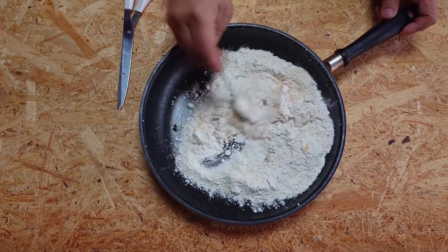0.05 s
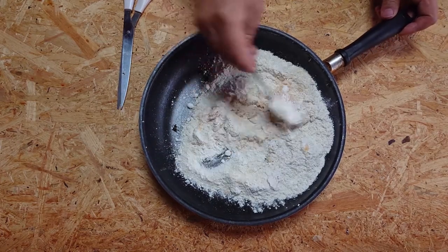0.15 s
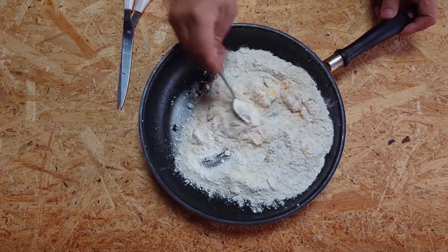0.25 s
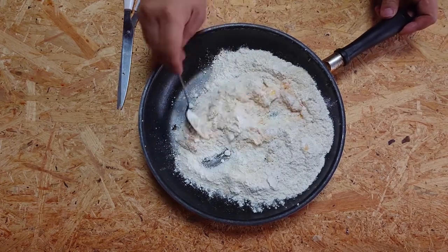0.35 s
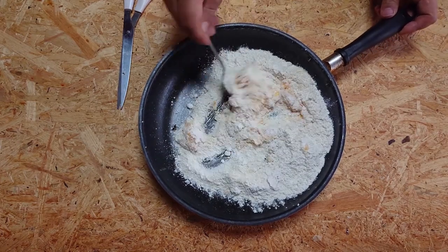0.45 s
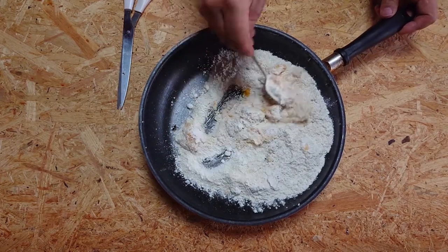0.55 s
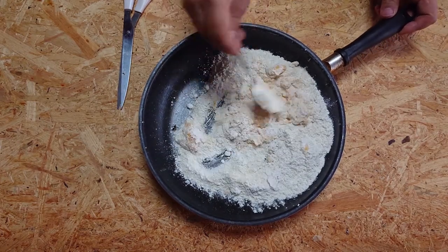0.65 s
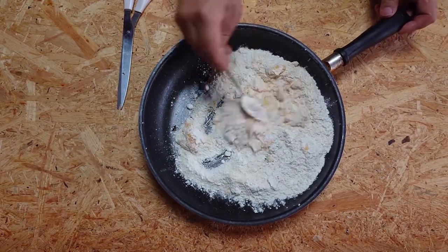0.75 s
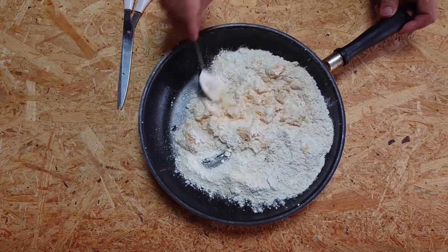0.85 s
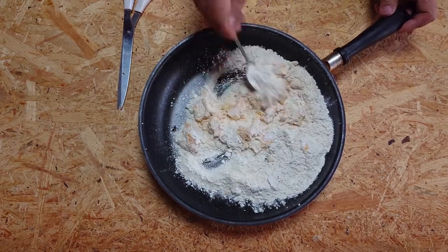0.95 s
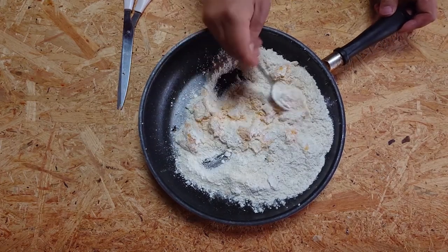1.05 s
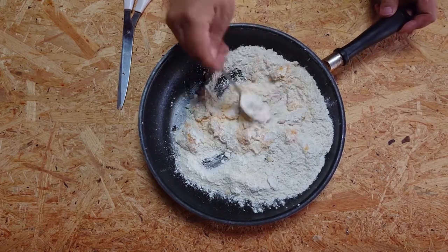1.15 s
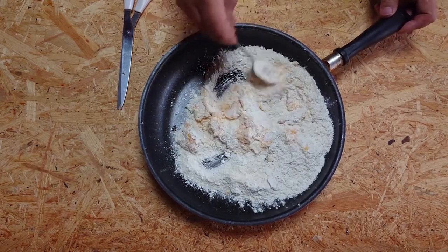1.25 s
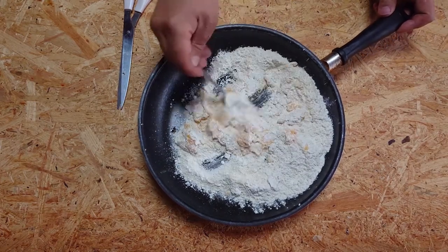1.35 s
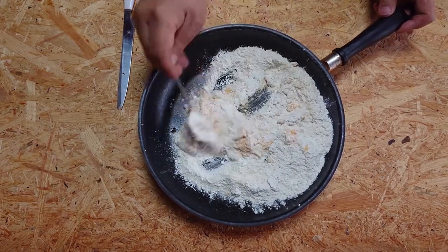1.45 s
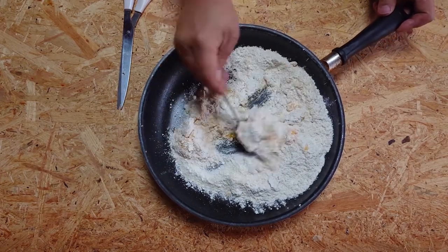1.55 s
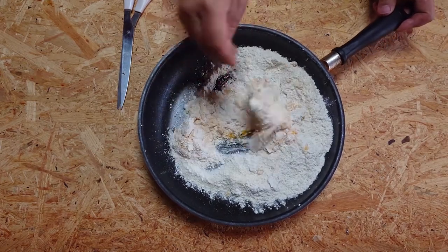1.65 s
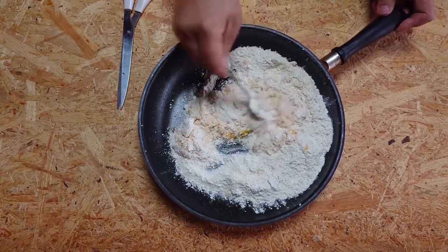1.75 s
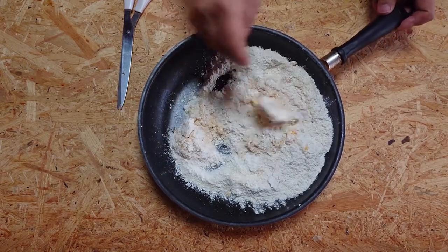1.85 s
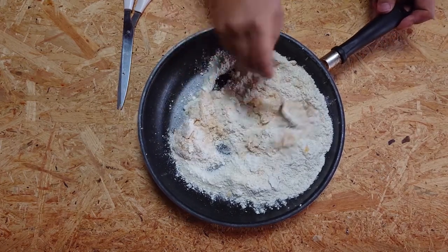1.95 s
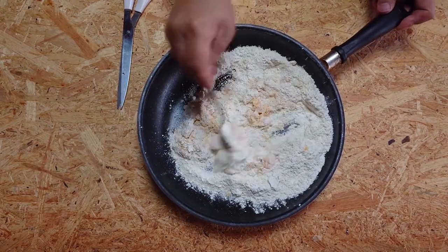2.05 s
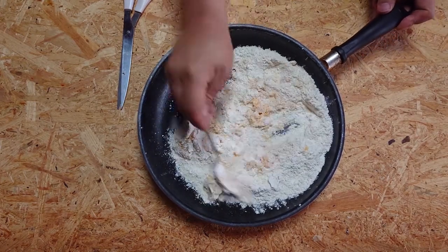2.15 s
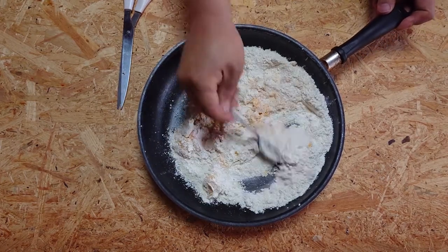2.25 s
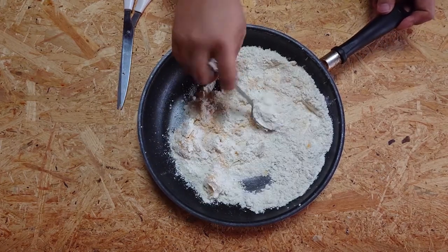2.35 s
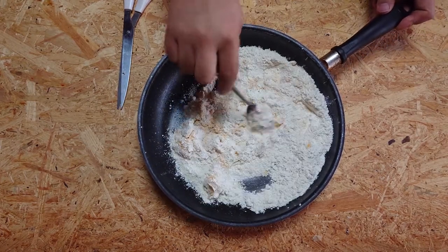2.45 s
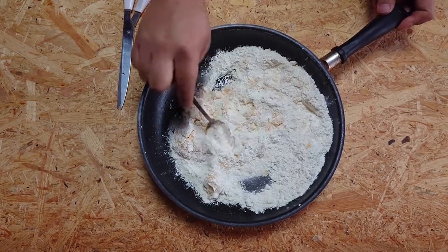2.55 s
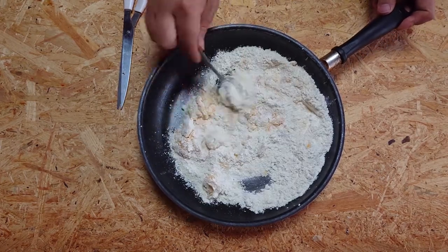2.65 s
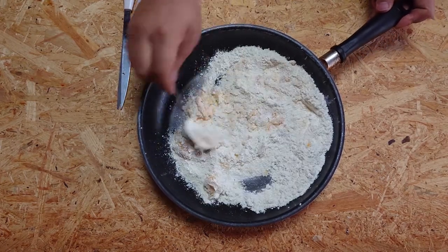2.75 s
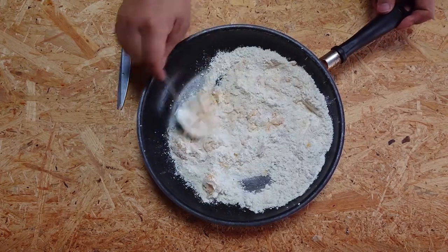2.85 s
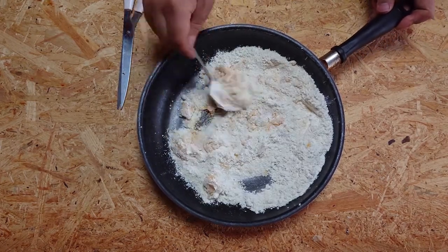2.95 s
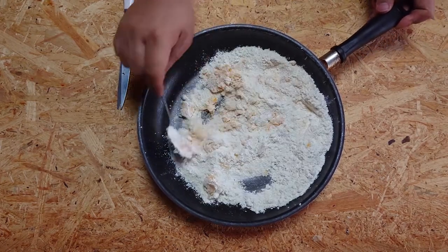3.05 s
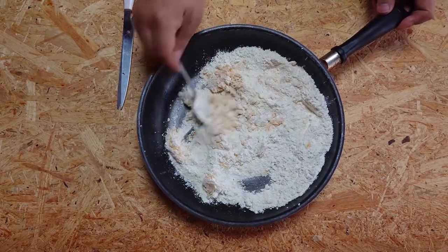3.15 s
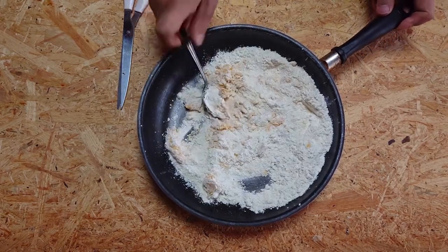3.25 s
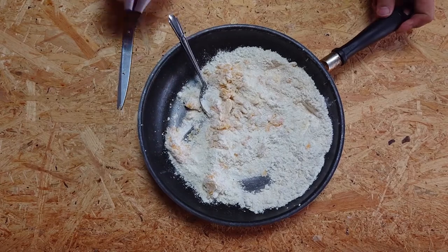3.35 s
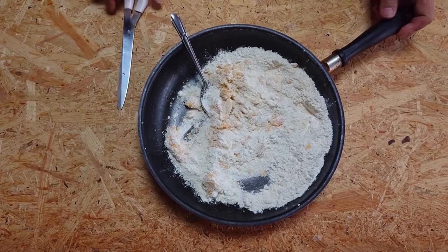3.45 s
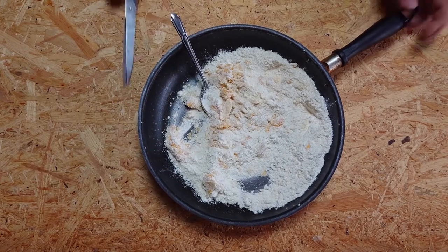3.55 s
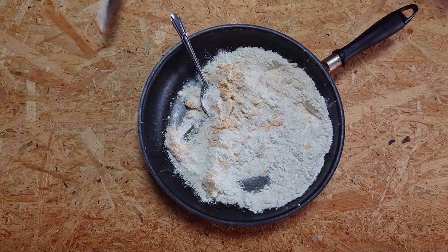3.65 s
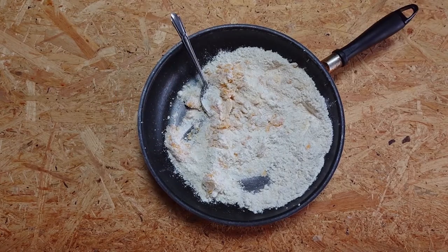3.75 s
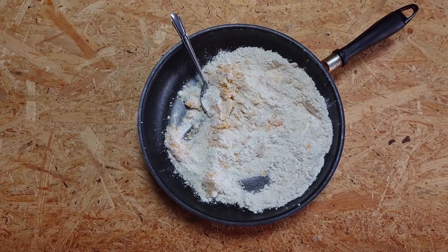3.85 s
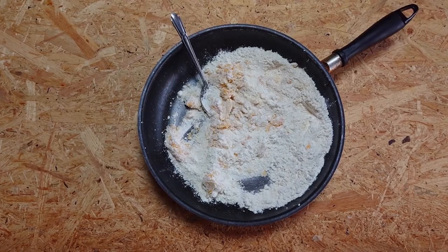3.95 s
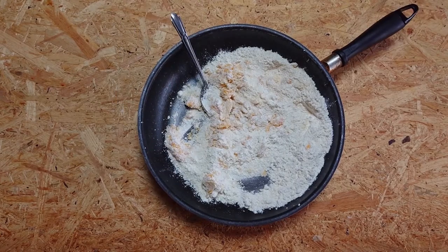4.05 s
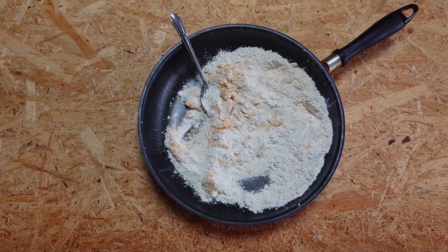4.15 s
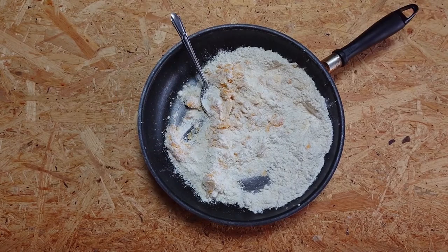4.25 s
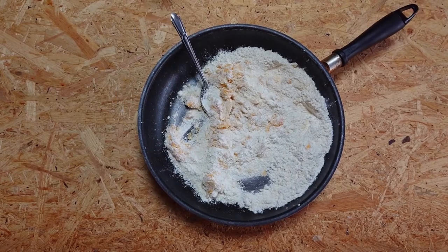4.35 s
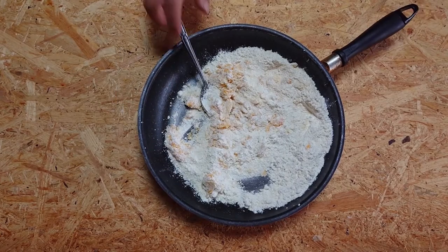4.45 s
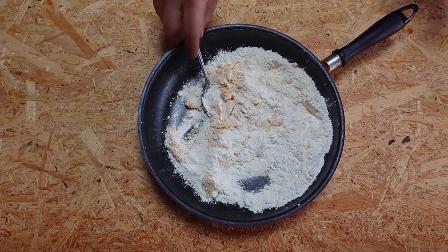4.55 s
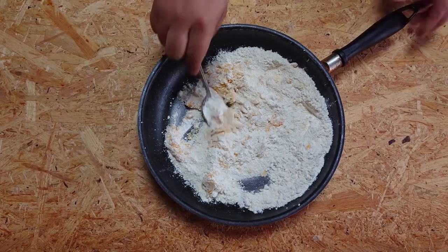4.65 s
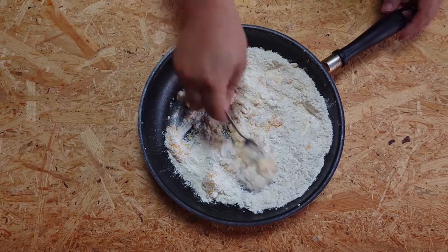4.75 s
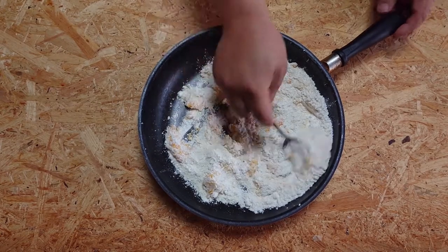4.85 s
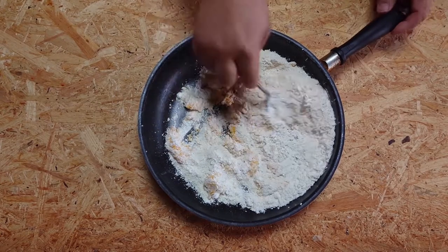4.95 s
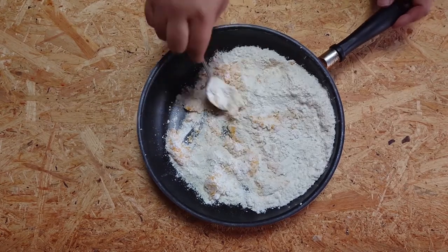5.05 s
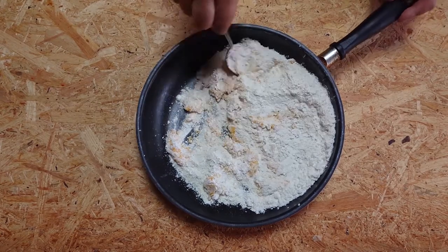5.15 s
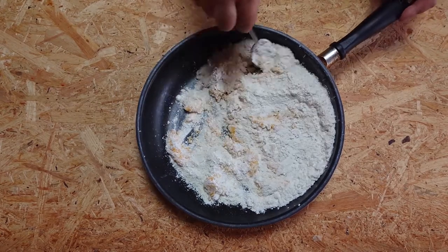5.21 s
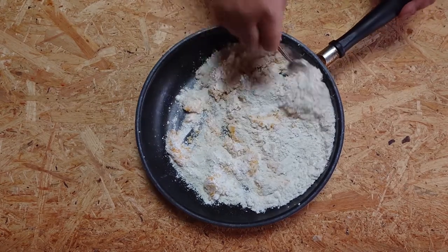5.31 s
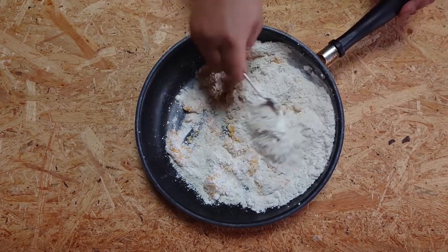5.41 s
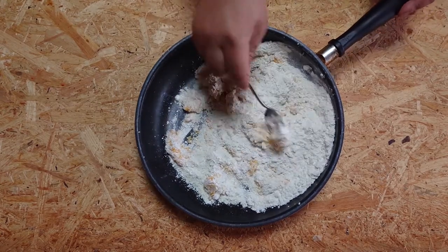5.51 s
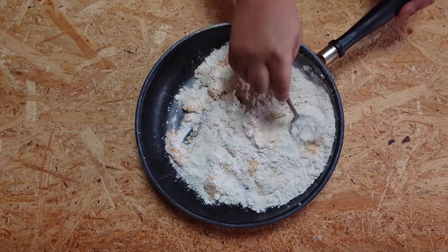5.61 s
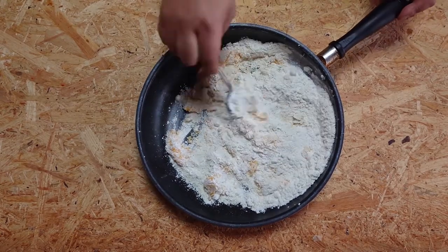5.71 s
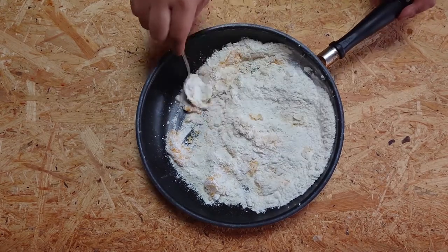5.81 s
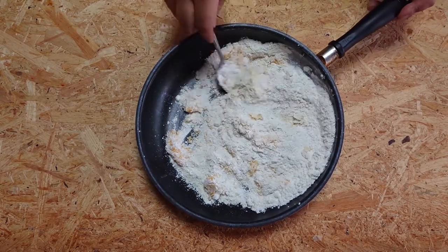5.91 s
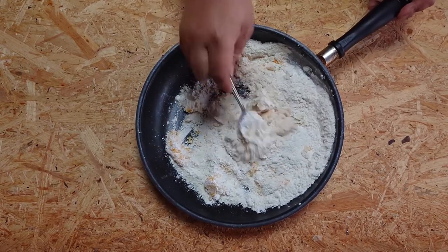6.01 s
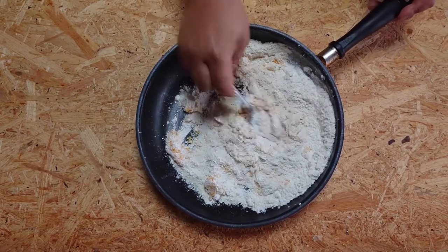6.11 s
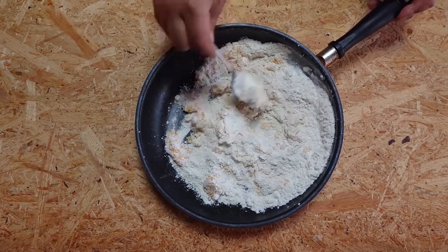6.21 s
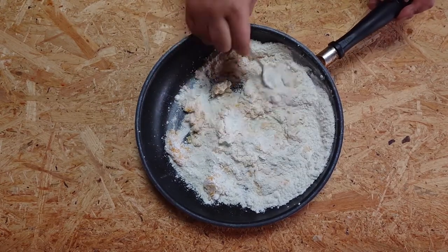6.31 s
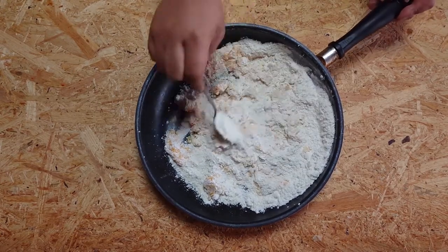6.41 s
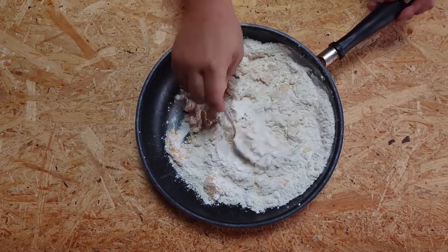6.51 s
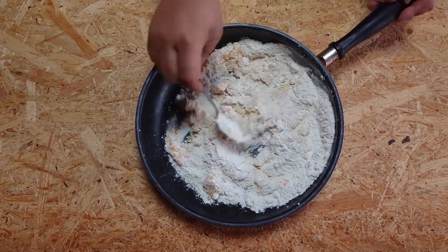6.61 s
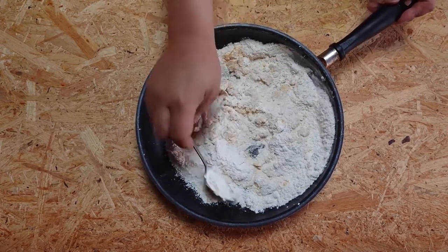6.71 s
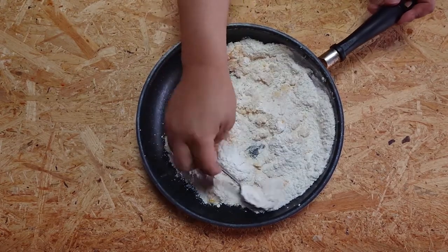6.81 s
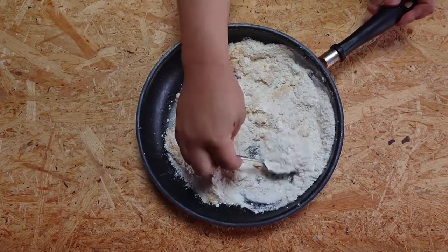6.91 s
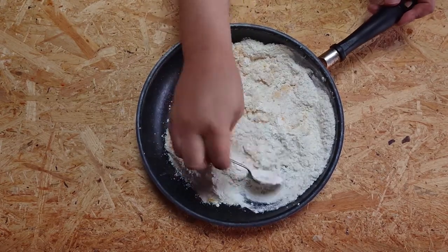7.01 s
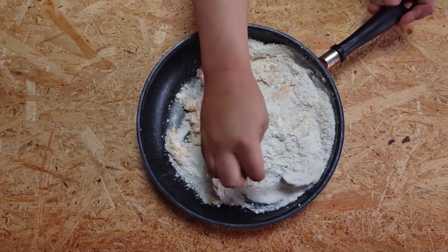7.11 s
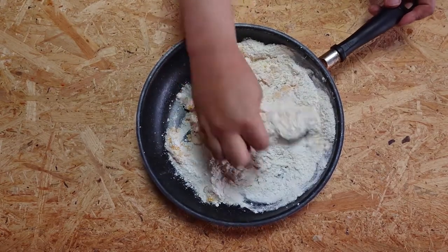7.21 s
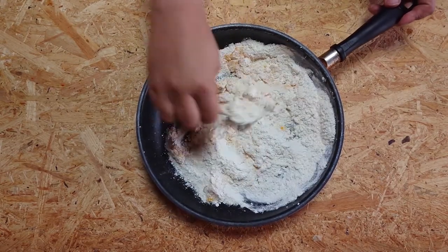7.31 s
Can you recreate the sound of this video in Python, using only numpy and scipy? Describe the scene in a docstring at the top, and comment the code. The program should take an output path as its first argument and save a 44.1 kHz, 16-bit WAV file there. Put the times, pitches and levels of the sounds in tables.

```python
"""A metal spoon stirs dry flour in a frying pan on a wooden board, heard by two close microphones in a small room.
From the start the spoon scrapes through to the pan as gliding resonances driven by stick-slip grains, over
a lumpy filtered-noise rumble of flour, room air and a faint tone. The pan rocks and knocks in dying modes; powder
hisses along the steel in soft grains. Midway the spoon clinks on the rim, a hard blow with many modes and a buzz;
the pan slides in rubs of filtered friction, and the stirring resumes."""
import sys
import numpy as np
from scipy import signal
from scipy.fft import rfft, irfft
from scipy.io import wavfile

SR = 44100
rng = np.random.default_rng(int(sys.argv[2]) if len(sys.argv) > 2 else 0)


def dump_mix(stems):
    """Bounce the given channels to the path in sys.argv[1] as a 16-bit WAV at rate SR."""
    frames = np.atleast_2d(stems).T  # one column per channel
    limited = np.clip(frames, -1, 1)  # hard clip at full scale
    pcm = np.round(limited * 32767).astype(np.int16)
    wavfile.write(sys.argv[1], SR, pcm)


N = 325017


def amp(db):
    """Decibels to gain."""
    return 10 ** (np.asarray(db) / 20)


def unit(x):
    """Scales to rms 1."""
    return x / np.sqrt(np.mean(x ** 2) + 1e-20)


def read(points, hz):
    """Joins (Hz, value) points on a log-frequency axis."""
    f, value = np.transpose(points)
    return np.interp(np.log(hz + 1), np.log(f + 1), value)


def bump(hz, centre, width):
    """The bell shape of a resonance, height 1."""
    return 1 / (1 + (2 * (hz - centre) / width) ** 2)


def add(mix, s, sound):
    """Mixes a sound in at time s."""
    part = mix[max(round(s * SR), 0):][:len(sound)]
    part += sound[:len(part)]


def colour(x, shape, size=2048):
    """Causal minimum-phase filter whose gain in dB is shape(Hz), held above -90 dB."""
    hz = abs(np.fft.fftfreq(size, 1 / SR))
    log_gain = np.log(amp(np.maximum(shape(hz), -90)))
    taps = np.fft.ifft(np.exp(np.conj(signal.hilbert(log_gain)))).real
    return signal.fftconvolve(x, taps[:size // 2])


def pair(x):
    """Two unrelated signals become a diffuse field at two close microphones, unlike in the treble."""
    # left-right likeness: pitch_hz, likeness (-1 to 1)
    likeness = [(60, 0.43), (130, 0.64), (290, 0.6), (640, 0.61), (1410, 0.51), (3100, -0.0056),
                (6820, -0.0065), (15000, -0.11)]
    a, b = rfft(x)
    same = np.clip(read(likeness, np.fft.rfftfreq(x.shape[1], 1 / SR)), -1, 1)
    return irfft([a, same * a + np.sqrt(1 - same ** 2) * b], x.shape[1])


def ring(modes):
    """The dying modes of a struck object, each a sine that falls 60 dB in its t60."""
    t = np.arange(SR // 3) / SR
    return sum(amp(db - 60 * t / t60) * np.sin(2 * np.pi * hz * t) for hz, db, t60 in modes)


def friction(length, crest, slips_per_s, spread_db, hiss, swell):
    """Tiny slips of uneven size over a fine hiss, under a pressure that rises and falls."""
    longest = SR // 2
    u = np.linspace(0, 1, np.clip(int(length * SR), 64, longest))
    draw = rng.random(longest)
    size, fine = rng.standard_normal((2, longest))
    slips = (draw < slips_per_s / SR) * np.sign(fine) * amp(spread_db * np.clip(size, -2, 2))
    pressure = np.interp(u, [0, np.clip(crest, .03, .97), 1], [0, 1, 0]) ** swell
    return pressure * (unit(slips[:len(u)]) + hiss * fine[:len(u)])


def levelled(sound, length, db):
    """Gives a burst this mean level over its length."""
    return amp(db) * sound * np.sqrt(length * SR / np.sum(sound ** 2))


def grate(length, crest, bare_s, treble_db, body_db, treble_hz=6500, body_hz=1400, muffled_hz=4000):
    """Steel sticks and slips on the pan floor; flour muffles it until the edge has cut through."""
    # steel on the pan floor: pitch_hz, density_db (per Hz)
    scrape_tone = [(180, -61.5), (300, -16), (645, -20.5), (1300, -13), (1810, -4.5), (2880, -3),
                   (3640, -5), (4230, -6), (4990, -5), (7080, -8), (9710, -5), (10900, -13), (12700, -6.5),
                   (16000, -13)]
    judder_hz, judder_db, judder_spread = 210, 6.5, .35  # median rate, fall between releases, log unevenness

    def shape(hz):
        treble = treble_db * hz ** 4 / (hz ** 4 + treble_hz ** 4)
        body = body_db / (1 + (hz / body_hz) ** 8)
        return read(scrape_tone, hz) + treble + body

    slips = friction(length, crest, slips_per_s=1600, spread_db=-2.5, hiss=1.0, swell=0.38)
    t = np.arange(len(slips)) / SR
    gaps = np.exp(judder_spread * rng.standard_normal(64)) / judder_hz
    releases = np.cumsum(np.r_[0, gaps])
    since_release = np.interp(t, releases, np.arange(len(releases))) % 1  # share of the current gap
    slips = slips * amp(-judder_db * since_release)
    muffled = signal.lfilter(*signal.butter(2, muffled_hz, fs=SR), slips)
    bare = np.minimum(t / bare_s, 1) ** 2
    return colour(bare * slips + (1 - bare) * muffled, shape)


def resonate(x, hz, width):
    """A resonance of gain 1 that follows the pitch curve hz."""
    turn = np.exp(2j * np.pi * np.cumsum(hz) / SR)
    r = np.exp(-np.pi * width / SR)
    return 2 * (turn * signal.lfilter([1 - r], [1, -r], x / turn)).real


def scrapes(place, count):
    """The grating wakes two resonances that glide as the place of contact moves."""
    # one row per contact of the spoon with the pan floor; a long stroke catches two or three times:
    # start_s, length_s, level_db (before the room), crest (moment of most pressure, 0-1),
    # bare_s (time to cut through the flour), treble_db, body_db, low_hz, low_db, high_hz, high_db,
    # width (ring width over pitch), glide_octaves
    contacts = [(0.0, 0.01, -39.5, 0, 0.0028, 4, 0, 3020, 10, 5830, 11.5, 0.29, -0.15),
                (.4765, 0.026, -29, 0.57, 0.0076, 5.5, -5, 3030, 27.5, 5160, 20, 0.2, -0.11),
                (.501, 0.021, -34.5, 0.2, .002, 8, 2.5, 2800, -2, 5640, 6, 0.28, 0),
                (.977, 0.017, -36, 0.28, 0.012, 9.5, -24, 2270, 12, 3000, 17, 0.28, 0.29),
                (.995, 0.04, -30, 0.43, .003, 12, -4, 2680, 21.5, 3500, 25, 0.21, 0.027),
                (1.41, .012, -63, 0.2, .003, -2, -2, 2700, 13, 4000, 3, .2, 0),
                (1.613, 0.034, -28.5, 0.64, 0.0066, 5.5, -4, 2780, 7.5, 5500, 11, 0.36, -0.1),
                (1.665, .02, -42.5, 0.2, 0.0034, -7, -2, 2400, -1, 5000, 0, 0.27, 0),
                (1.735, 0.057, -61, 0, .004, 1, 23, 1800, 18, 2580, 10, .25, 0),
                (2.036, 0.0095, -51, 0.1, 0.0022, 2, 18, 2720, 10, 4240, -8, 0.66, -0.0049),
                (2.277, 0.017, -41, 0.7, 0.0074, 5.5, 3, 2600, 5, 3740, 5.5, 0.082, -0.082),
                (2.476, 0.01, -68, .5, .004, -6, 2, 2700, 2, 3500, 22, 0.15, 0),
                (3.24, .015, -65.5, .5, .004, 0, -2, 2700, 9, 3600, 6, 0.18, 0),
                (4.812, 0.041, -44.5, 0.65, 0.0029, -3, 8, 2850, 10.5, 5650, 9.5, 0.3, -0.22),
                (4.849, 0.032, -46.5, 0.8, .003, -6, -9, 2850, 10, 3760, 3, 0.18, -0.048),
                (4.88, 0.051, -53.5, 0.4, .003, 2.5, 7, 2700, 10.5, 3700, 3, 0.13, 0.039),
                (5.405, 0.025, -43, 0.4, 0.0022, 1.5, 9.5, 2410, 14.5, 4000, 18, 0.19, 0.078),
                (5.445, 0.02, -42, 0.9, 0.0022, -1, 6.5, 2300, 13.5, 3940, 16, 0.15, 0.17),
                (5.951, 0.059, -63, 0, 0.0049, 4, 8, 2180, 16, 3370, 7, 0.22, 0.14),
                (5.992, 0.041, -47, 0.66, 0.0067, 2.5, -14, 2350, 15.5, 3460, 11, 0.2, 0.26),
                (6.637, 0.016, -30, 0.78, 0.0056, 2.5, -4.5, 3870, 12.5, 5530, 13.5, 0.1, -0.024),
                (6.888, 0.036, -48, 0.4, .005, 8, 1, 2440, 7, 4360, 17.5, 0.12, -0.48),
                (6.926, 0.037, -46.5, 0.8, .002, 5, 4, 2580, 11.5, 4130, 16, 0.19, -0.22),
                (7.197, 0.034, -45, 0.12, 0.0011, 8.5, 3, 2650, 12, 3910, 16, 0.077, -0.034),
                (7.244, 0.054, -43.5, 0.08, .002, 3, 0, 2440, 7, 3850, 16, 0.093, 0.17)]
    out = np.zeros(N)
    for (s, length, db, crest, bare_s, treble_db, body_db,
         low_hz, low_db, high_hz, high_db, width, glide) in contacts[place::count]:
        rub = grate(length, crest, bare_s, treble_db, body_db)
        u = np.minimum(np.arange(len(rub)) / SR / length, 1)
        bend = 2 ** (glide * (u - .5))
        rings = sum((amp(ring_db) - 1) * resonate(rub, hz * bend, hz * width)
                    for hz, ring_db in [(low_hz, low_db), (high_hz, high_db)])
        add(out, s, levelled(rub + rings, length, db))
    return out


def flour(lumps_db=3, fade_s=0.23):
    """A soft, lumpy rumble of filtered noise as the spoon ploughs through the powder."""
    # spells of stirring at full effort, fades lying outside: start_s, end_s, level_db (before the room)
    spells = [(0, 4.2, -64), (4.8, 7.4, -68)]
    # rumble of the powder: pitch_hz, density_db (per Hz)
    flour_tone = [(20, -51.5), (50, -27), (80, -1.5), (170, 3), (300, -4.5), (600, -22), (1200, -20.5),
                  (3500, -38.5), (9000, -39), (16000, -43)]
    lumps = unit(signal.oaconvolve(rng.standard_normal(N), signal.windows.hann(SR // 14), "same"))
    rub = colour(rng.standard_normal(N) * amp(lumps_db * lumps), lambda hz: read(flour_tone, hz))[:N]
    t = np.arange(N) / SR
    effort = sum(amp(db) * np.clip(1 + np.minimum(t - start, end - t) / fade_s, 0, 1)
                 for start, end, db in spells)
    return unit(rub) * effort


def air(level_db=-64.5):
    """Steady room noise, diffuse at the two microphones."""
    # noise of the room: pitch_hz, density_db (per Hz)
    air_tone = [(15, -56), (25, -30), (43, -29.5), (68, -16), (145, -0.5), (212, -7), (285, -9),
                (427, -11.5), (545, -9), (624, -14.5), (1100, -21), (1790, -22.5), (2550, -25),
                (4140, -26.3), (13000, -33.5), (16000, -38)]
    # shallow dips in that noise: pitch_hz, width_hz, height_db
    air_dips = [(524, 47, -2.5), (169, 190, -4)]
    hz = np.fft.rfftfreq(N, 1 / SR)
    shape = read(air_tone, hz) + sum(db * bump(hz, f, width) for f, width, db in air_dips)
    noise = pair(rng.standard_normal((2, N)))
    return amp(level_db) * unit(irfft(rfft(noise) * amp(shape), N))


def hum(pitch_hz=527, level_db=-74, waver_hz=2.87):
    """A faint tone in the room, its pitch wavering slightly with smoothed noise."""
    waver = unit(signal.oaconvolve(rng.standard_normal(N), signal.windows.hann(SR // 8), "same"))
    phase = 2 * np.pi * np.cumsum(pitch_hz + waver_hz * waver) / SR
    return amp(level_db) * unit(np.sin(phase))


def knocks(push_hz=105, push_t60=0.076, lowest_hz=105, low_share=0.47):
    """The pan rocks on the board: a soft blow wakes the low modes, a hard one the higher ones."""
    # blows: start_s, peak_db (before the room), push_db (weight of the deep push), hardness_hz (corner), rise_s
    blows = [(.305, -27, -28, 526, 0.0018), (1.894, -49.5, -25, 510, .002), (2.059, -27.5, -47, 425, 0.001),
             (2.785, -46, -29, 343, 0.0055), (2.985, -45, -22, 410, .006), (3.547, -49.5, -11, 2600, .0005),
             (3.553, -34.5, -20, 322, 0.0016), (3.56, -59, -20, 3200, .0005),
             (3.602, -39, -24, 1700, 0.00043), (3.612, -36, -30, 398, 0.0016),
             (3.624, -45, -22, 1500, 0.00092), (3.649, -28, -21, 1800, 0.00054),
             (3.664, -33.5, -22, 1500, .0004), (3.6737, -34.5, -24, 1860, 0.00036),
             (3.685, -41, -25, 1300, 0.00034), (4.371, -56, -5.5, 650, .006), (4.803, -25, -3, 1090, 0.002),
             (4.809, -33.5, -4, 1000, 0.0016), (5.015, -46.5, -8, 330, 0.003),
             (5.075, -41.5, -6.5, 766, 0.003), (5.295, -36, -36, 450, 0.0019),
             (5.724, -40, -6, 604, 0.0016), (5.96, -39.5, -30, 370, .003), (5.976, -42.5, -19, 285, 0.0023),
             (7.196, -42.5, -27, 260, 0.0013)]
    # pan and board together: pitch_hz, level_db (before the blow's hardness), t60_s
    pan_modes = [(167, -9, 0.12), (214, -7, 0.078), (257.4, 3, 0.056), (382, -1.5, 0.036),
                 (487, 5.5, 0.024), (600, -4.5, 0.048), (706, -14.5, 0.046), (845, -9.5, 0.031),
                 (1314, -12, 0.033), (1625, -2, 0.014), (1877, -7.5, 0.028), (2470, -9, 0.037),
                 (2930, -10, 0.017)]
    out = np.zeros(N)
    for s, db, push_db, corner_hz, build_s in blows:
        woken = [(hz, mode_db - 10 * np.log10(1 + (low_share * corner_hz / hz) ** 4), t60)
                 for hz, mode_db, t60 in pan_modes]
        blow = ring(woken + [(push_hz, push_db, push_t60)])
        blow = blow * (1 - np.exp(-np.arange(len(blow)) / SR / build_s))

        def shape(hz):
            return -10 * np.log10((1 + (hz / corner_hz) ** 4) * (1 + (lowest_hz / (hz + 1)) ** 8))

        blow = colour(blow, shape, size=8192)
        add(out, s, amp(db) * blow / abs(blow).max())
    return out


def sweeps():
    """The spoon's back sweeps over deep powder, which slips along the steel with a soft, grainy hiss."""
    # strokes: start_s, length_s, level_db (before the room), crest (moment of most pressure, 0-1)
    strokes = [(2.77, 0.26, -64, 0.22), (4.939, 0.35, -66, .3)]
    # powder along steel: pitch_hz, gain_db
    sweep_tone = [(500, -16), (1800, -5), (3000, 0), (5000, -1), (9000, -2.5), (16000, -8)]
    out = np.zeros(N)
    for s, length, db, crest in strokes:
        grains = friction(length, crest, slips_per_s=900, spread_db=5.5, hiss=1.2, swell=0.31)
        add(out, s, levelled(colour(grains, lambda hz: read(sweep_tone, hz)), length, db))
    return out


def clinks(buzz_db=-24, buzz_t60=0.15, buzz_above_hz=6000, bowl_hz=9100, bowl_width_hz=2400, bowl_db=7,
           lowest_hz=160, contact_s=0.00015):
    """Steel on the bare rim: hard blows wake the spoon's modes, with a brief buzz as the spoon settles."""
    # the spoon meets the rim: start_s, gain_db (before the room)
    touches = [(3.4018, -3.5), (3.4128, -18)]
    # the spoon's ring: pitch_hz, level_db (before the treble tilt), t60_s
    spoon_modes = [(257.7, -8, 0.036), (700, -3, 0.00804), (1396, -7, 0.032), (2160, -25.5, 0.06),
                   (2294, 7.5, 0.0035), (2725, 16, 0.0018), (3040, -19, 0.023), (3410, -32, 0.19),
                   (5110, -13.5, .08), (8060, 2, 0.065), (8540, -6, 0.053), (8845, -0.5, 0.066),
                   (9040, 3, .018), (9170, -7, .06), (10130, -4.5, 0.067), (10250, -7, 0.033),
                   (12530, -3, 0.052), (13300, -8.5, 0.06), (14150, -12.5, 0.07), (14460, -10, 0.05)]
    mode_split = 0.0049  # the spoon's bowl is not quite even, so each of its modes has a close twin
    out = np.zeros(N)
    blow = ring(spoon_modes) + ring([(hz * (1 - mode_split), db, t60) for hz, db, t60 in spoon_modes])
    blow = np.diff(blow, prepend=0) + 0.61 * blow  # a stiff contact radiates mostly treble
    t = np.arange(len(blow)) / SR
    blow = blow * (1 - np.exp(-t / contact_s))

    def buzz_shape(hz):
        bowl = bowl_db * bump(hz, bowl_hz, bowl_width_hz)
        return bowl - 10 * np.log10(1 + (buzz_above_hz / (hz + 1)) ** 2)

    buzz = rng.standard_normal(len(blow)) * amp(buzz_db - 60 * t / buzz_t60)
    buzz = colour(buzz, buzz_shape)[:len(blow)]
    blow = colour(blow / abs(blow).max() + buzz, lambda hz: -10 * np.log10(1 + (lowest_hz / (hz + 1)) ** 4))
    for s, db in touches:
        add(out, s, amp(db) * blow)
    return out


def slides():
    """The pan's base rubs over rough wood in uneven slips, each rub with its own brightness."""
    # rubs: start_s, length_s, level_db (before the room), crest (moment of most pressure, 0-1),
    # brightness_hz (corner)
    rubs = [(3.558, 0.036, -61.5, 0, 2610), (3.601, 0.038, -50, 0.55, 3000),
            (3.655, 0.034, -45.5, 0.25, 12000), (4.274, 0.0076, -61, 0.1, 3520),
            (4.355, 0.023, -62, 0.26, 4970)]
    # base on wood: pitch_hz, density_db (per Hz)
    slide_tone = [(59, -58), (100, -29), (265, -3.5), (480, -14), (600, -8), (836, -3.5), (970, -22),
                  (1150, -12), (1400, -15), (1620, -11), (1950, -7.5), (2200, -13), (2470, -9),
                  (2750, -12.5), (4200, -15), (9410, -20.5), (12700, -17), (16000, -17)]
    out = np.zeros(N)
    for s, length, db, crest, corner_hz in rubs:
        slips = friction(length, crest, slips_per_s=700, spread_db=4, hiss=0.4, swell=0.4)
        rub = colour(slips, lambda hz: read(slide_tone, hz) - 10 * np.log10(1 + (hz / corner_hz) ** 2))
        add(out, s, levelled(rub, length, db))
    return out


def room(x, wet_db, lean_db, lag_samples, onset_s=0.0049):
    """Direct sound reaching the left microphone first, a few near echoes, and a short diffuse tail."""
    # decay of the tail: pitch_hz, t60_s
    decay = [(100, 0.17), (300, 0.089), (1000, 0.17), (3000, 0.13), (8000, 0.14), (16000, 0.095)]
    # nearby surfaces: delay_s, level_db (in the bass)
    echoes = [(.0036, -9), (.0062, -18.5), (0.0132, -15.5)]
    size, lead = SR // 2, SR // 2000  # lead: samples kept ahead of the direct sound
    hz, t, z = signal.stft(pair(rng.standard_normal((2, size))), SR, nperseg=256)
    fading = z * amp(-60 * t / read(decay, hz)[:, None])
    tail = signal.istft(fading, SR, nperseg=256)[1][:, :size]
    tail *= np.clip(np.arange(size) / SR / onset_s - 1, 0, 1)
    tail /= np.linalg.norm(tail[0])
    hz = np.fft.rfftfreq(size, 1 / SR)
    # rough surfaces mirror the bass and scatter the treble
    near = 1 + sum(amp(db) * np.exp(-2j * np.pi * hz * s) for s, db in echoes) / (1 + hz / 3500)
    left = amp(-lean_db * hz / (hz + 1500)) + 0j  # lean: treble kept from the left microphone
    right = np.exp(-2j * np.pi * hz * lag_samples / SR)
    direct = np.roll(irfft(near * np.array([left, right]), size), lead, axis=1)
    response = (direct + amp(wet_db) * tail) / np.sqrt(1 + amp(wet_db) ** 2)
    return signal.fftconvolve(x[None], response, axes=1)[:, lead:][:, :N]


def scene(count=3):
    """All the sounds of the pan in the room; the spoon visits several places, each with its own diffuse tail."""
    spoon = sum(room(scrapes(place, count), wet_db=-1.0, lean_db=0.0, lag_samples=1.13)
                for place in range(count))
    pan = room(knocks() + flour(), wet_db=-3.5, lean_db=-1.0, lag_samples=0.24)
    base = room(sweeps() + slides(), wet_db=3.0, lean_db=4.0, lag_samples=0.34)
    rim = room(clinks(), wet_db=-8.5, lean_db=8.5, lag_samples=1.96)
    # left and right balance in dB
    return spoon * amp([[-.3], [1.3]]) + rim + (pan + base + air() + hum()) * amp([[-.7], [.7]])


def record(dry):
    """The recorder's band limit: a linear-phase low-pass."""
    edge_hz = 15900
    taps = signal.firwin(301, edge_hz, window=("kaiser", 8), fs=SR)
    return signal.oaconvolve(dry, taps[None], "same")


dry = scene()
out = record(dry)
dump_mix(out)
```